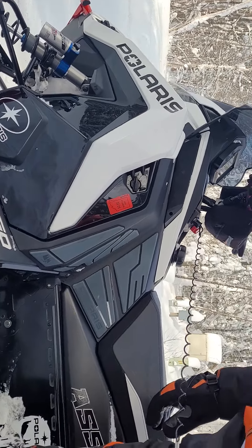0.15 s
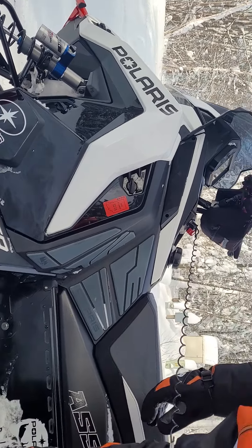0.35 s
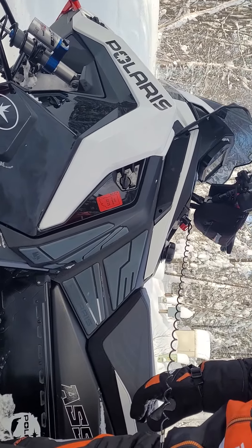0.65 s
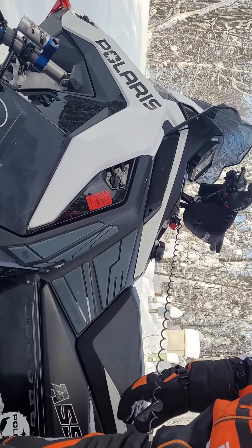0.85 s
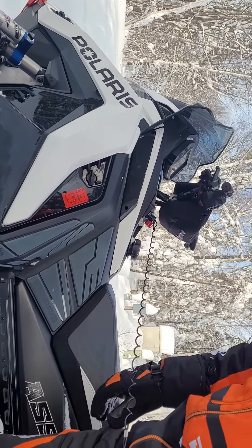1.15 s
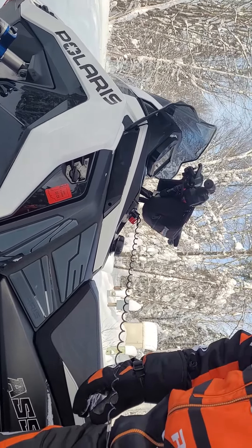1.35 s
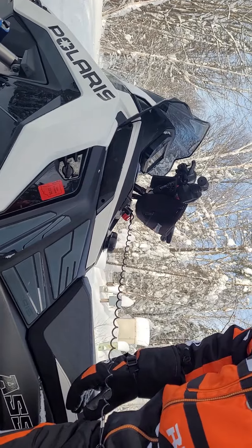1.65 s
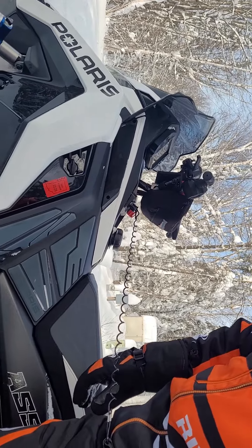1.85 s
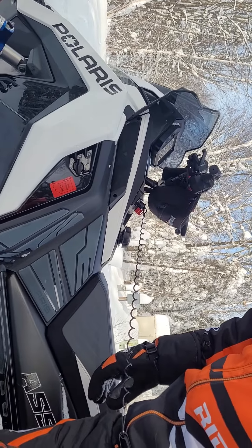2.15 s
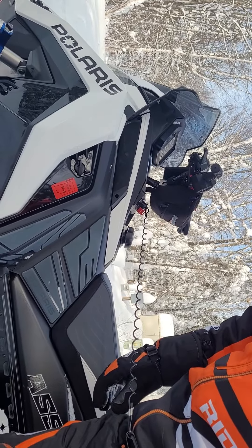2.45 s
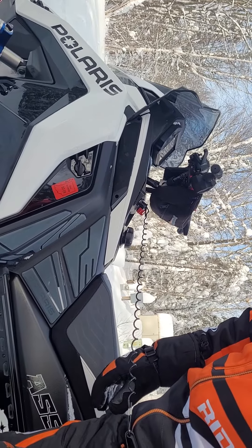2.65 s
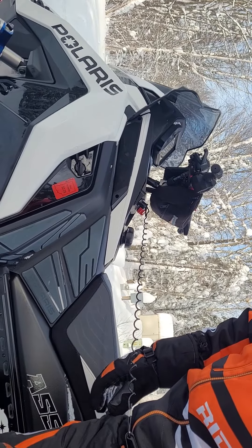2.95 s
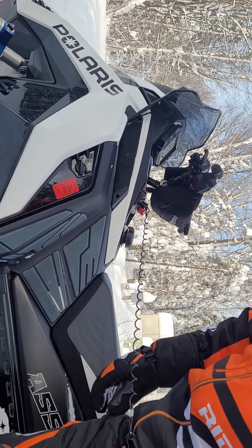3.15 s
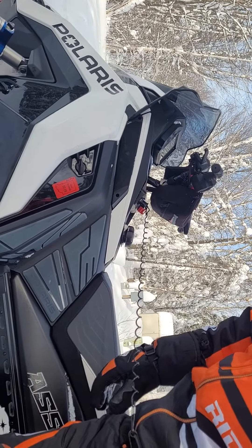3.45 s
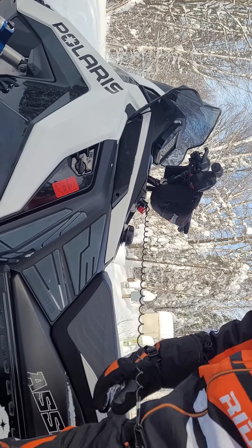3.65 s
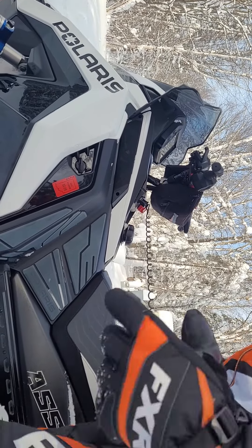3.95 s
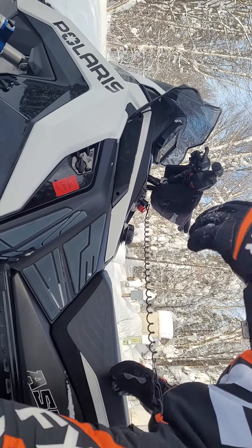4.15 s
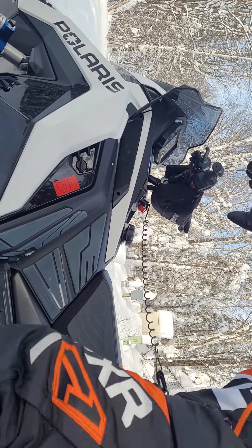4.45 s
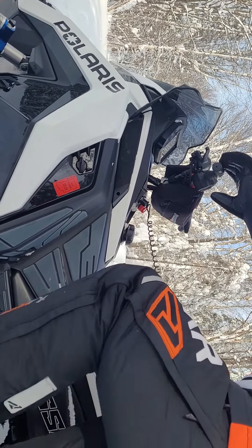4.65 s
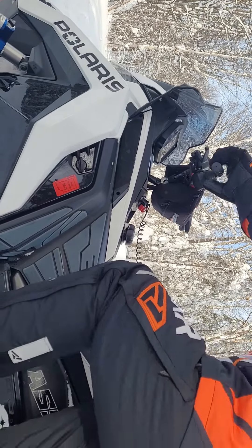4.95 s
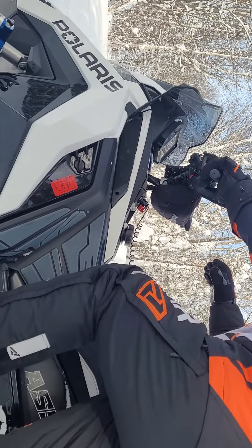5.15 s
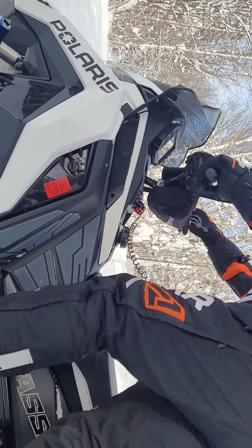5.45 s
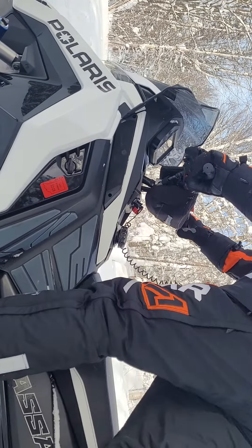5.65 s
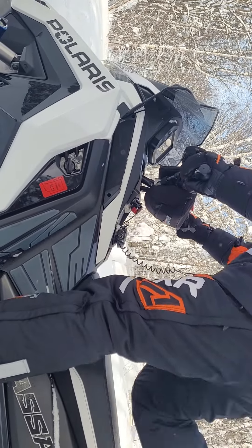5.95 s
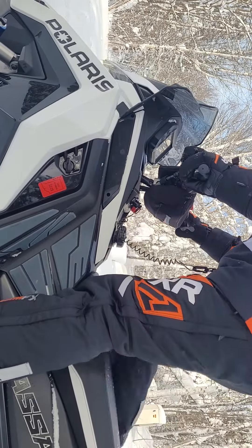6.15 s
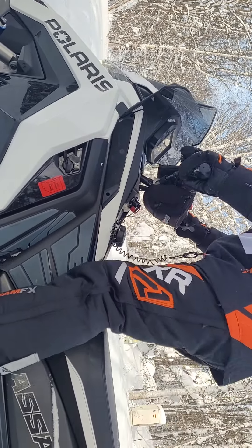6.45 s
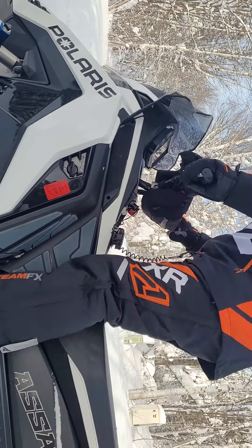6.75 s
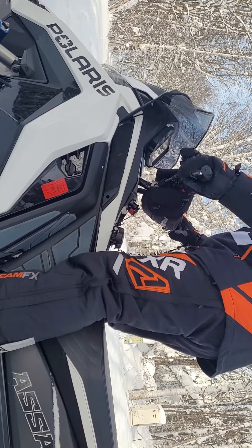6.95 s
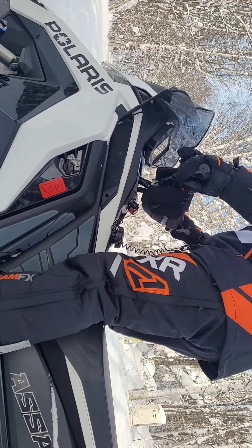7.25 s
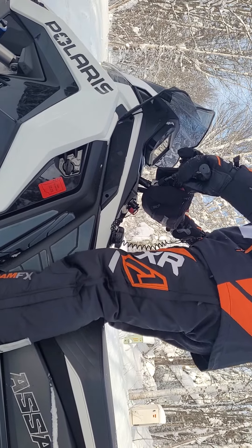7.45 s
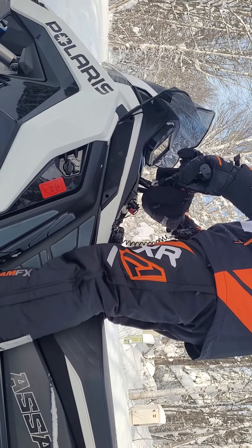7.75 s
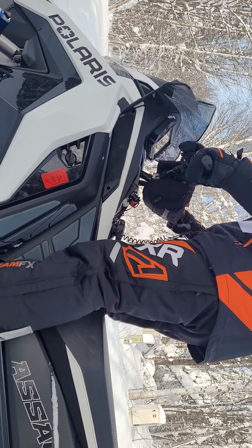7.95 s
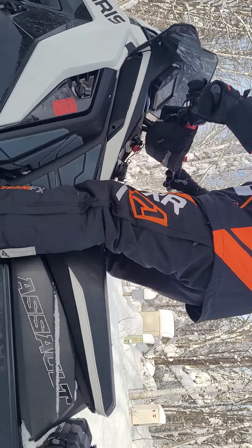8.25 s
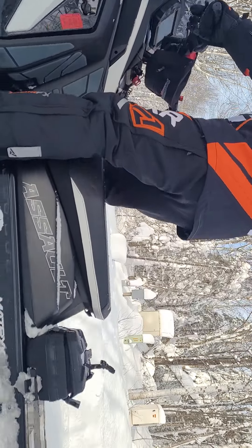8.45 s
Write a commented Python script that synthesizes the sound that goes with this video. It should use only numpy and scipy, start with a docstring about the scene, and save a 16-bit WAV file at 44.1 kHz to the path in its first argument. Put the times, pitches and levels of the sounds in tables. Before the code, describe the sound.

A two-stroke snowmobile idles loudly close to the microphone, outdoors on snow: a low drone with irregular thuds, pops and a metallic rattle. Midway, the rider's stiff suit rustles faintly and the bodywork gives a few light knocks. About seven seconds in the throttle opens, and the engine stumbles briefly, then climbs to a higher, buzzing pitch as the machine pulls away with clatter and a growing track hiss.

```python
"""A two-stroke twin snowmobile engine idles close by on snow, then opens up and pulls away.
At idle the pistons pump a drone out of the resonant exhaust pipe, and only every few strokes burn,
each with a thud and a rattle. The rider's suit rustles and the bodywork knocks now and then.
Under throttle the engine stumbles, then fires on every stroke: its harmonics sweep through the
pipe's resonances while the casing clatters and the track hisses louder with speed."""
import sys
import numpy as np
from scipy import signal
from scipy.fft import rfft, irfft
from scipy.io import wavfile
from scipy.ndimage import uniform_filter1d

SR = 44100
rng = np.random.default_rng(int(sys.argv[2]) if len(sys.argv) > 2 else 0)


def unload_wav(signal):
    """Save mono or channel-first audio to the path in sys.argv[1] as 16-bit WAV at rate SR, clipped to [-1, 1]."""
    wavfile.write(
        sys.argv[1],
        SR,
        np.round(np.clip(np.atleast_2d(signal).T, -1, 1) * 32767).astype(np.int16),
    )


N = 379701
T = np.arange(N) / SR
FREQS = np.fft.rfftfreq(2 * N, 1 / SR)
IDLE_HZ, THROTTLE_S = 57.4, 7.12  # stroke rate at idle, moment the throttle opens

# Idle strokes that burn, in a loping pattern. Each row: time in seconds, relative rattle level in dB.
BURNS = [(0.0009, 0.5), (0.0875, 0), (0.14, 4.5), (0.2246, -1), (0.2595, -2.5), (0.3106, 0.5), (0.397, 2),
         (0.4479, 5.5), (0.534, -4), (0.5864, 1.5), (0.71, -3.5), (0.744, -2), (0.8486, -1), (0.9025, -1.5),
         (0.936, -4.5), (0.9915, 0.5), (1.044, -0.5), (1.1302, 0.5), (1.1797, 2), (1.2684, 2.5),
         (1.3177, -2.5), (1.4083, 1), (1.4618, 0.5), (1.548, -1.5), (1.6034, 3), (1.6879, 0.5),
         (1.7413, -0.5), (1.7914, -3.5), (1.8244, 5.5), (1.9158, 0.5), (1.9666, 2), (2.0527, -5.5),
         (2.089, -2), (2.141, -2), (2.1922, -4), (2.2267, -5.5), (2.2815, 3.5), (2.3676, -2), (2.4215, 2.5),
         (2.4723, -1), (2.5595, -2), (2.6105, 2.5), (2.6945, -6), (2.7281, -1.5), (2.8197, 2), (2.87, -1.5),
         (2.9606, 3), (3.0126, 3.5), (3.0968, -1), (3.1879, 3), (3.239, 1.5), (3.3252, 1.5), (3.3758, -4),
         (3.411, 1), (3.4622, -1), (3.516, -2), (3.5507, -8.5), (3.5853, -5.5), (3.6406, 2), (3.7623, -4),
         (3.8153, -5.5), (3.8673, -1), (3.959, -1), (4.0135, 4), (4.1554, 4.5), (4.3144, 3.5),
         (4.4558, 3.5), (4.5429, 0.5), (4.6489, 1.5), (4.699, 1.5), (4.7849, -8), (4.8209, -3.5),
         (4.8723, 2), (4.9565, 3), (5.0477, 4), (5.1007, 1.5), (5.1505, -1.5), (5.185, 4), (5.2389, 6),
         (5.3246, 2), (5.3768, -3), (5.4129, 3.5), (5.4647, 4), (5.552, 2), (5.6024, 0), (5.6883, -0.5),
         (5.7747, 5), (5.8253, -0.5), (5.9147, 4.5), (5.9643, 1.5), (6.0473, -3), (6.0825, 2), (6.1339, 5),
         (6.22, 1), (6.2727, -2.5), (6.307, -5.5), (6.3596, -7.5), (6.3955, -1), (6.4473, 6), (6.535, 4),
         (6.6235, 0.5), (6.6731, 5), (6.8118, 6), (6.9298, -4), (6.9835, 4), (7.1056, 4)]
BURN_TIMES, BURN_RATTLE_DB = np.transpose(BURNS)
# Pulling away. Each row: time in seconds, stroke rate in Hz, relative clatter level in dB.
PULL_AWAY = [(7.12, 60.8, -56), (7.128, 61.41, -28), (7.24, 69.65, -39.5), (7.654, 122, -30),
             (7.692, 129.6, -31), (7.758, 134.2, -30), (7.842, 146.2, -30), (7.936, 153.6, -30),
             (8.256, 163.8, -30), (8.476, 160.2, -32), (8.604, 151.7, -33), (8.61, 150.4, -30)]
# Response of exhaust pipe and silencer. Each row: frequency in Hz, gain in dB.
PIPE_RESPONSE = [(22, -38), (38, -6), (60, 6), (95, 4), (118, 17.5), (138, -1), (162, 4), (200, -8),
                 (240, -6.5), (285, -1), (330, -14.5), (395, -9.5), (460, -22), (900, -75.5)]


def undb(db):
    """Decibels to amplitude ratio."""
    return 10 ** (np.asarray(db) / 20)


def unit(x):
    """Normalisation to rms 1."""
    return x / np.sqrt(np.mean(x ** 2))


def along(points, column=1):
    """Linear interpolation of one column over time; the first column is in seconds."""
    rows = np.array(points)
    return np.interp(T, rows[:, 0], rows[:, column])


def across(points):
    """Interpolation of (Hz, value) points on a log-frequency axis."""
    hz, value = np.transpose(points)
    return np.interp(np.log(FREQS + 1), np.log(hz), value)


def through(x, response):
    """Linear filtering: the spectrum is multiplied by a frequency response."""
    return irfft(rfft(x, 2 * N) * response)[..., :N]


def body(points):
    """Minimum-phase response with a (Hz, dB) outline: it rings after a blow, never before."""
    cepstrum = irfft(across(points) * np.log(10) / 20)
    cepstrum[1:N] *= 2
    cepstrum[N + 1:] = 0
    return np.exp(rfft(cepstrum))


def resonance(hz, width_hz):
    """Response of a damped oscillator, gain 1 at its centre."""
    return 1j * FREQS * width_hz / (hz ** 2 - FREQS ** 2 + 1j * FREQS * width_hz)


def clicks(times, sizes):
    """Impulse train with the given times and heights."""
    return np.bincount(np.clip(np.asarray(times) * SR, 0, N).astype(int), sizes, N + 1)[:N]


def swell(x, peak_s, sharp):
    """Convolution turns each impulse into a bump of its own height that peaks after peak_s."""
    age = T[:SR // 3] / peak_s
    return signal.fftconvolve(x, (age * np.exp(1 - age)) ** sharp)[:N]


def scatter(count, spread_db):
    """Log-normal random gains."""
    return undb(spread_db * rng.standard_normal(count))


def grit(spread_db, size=48):
    """Random amplitude modulation breaks two noises into millisecond grains."""
    grains = np.repeat(scatter(N // size + 1, spread_db), size)[:N]
    return unit(grains * rng.standard_normal((2, N)))


def stereo(pair):
    """Partial coherence: two unrelated signals become more alike in the lows; the treble leans left."""
    # Each row: frequency in Hz, correlation of left and right.
    coherence = [(400, .35), (700, .4), (1400, .4), (2800, .2), (6000, .08)]
    # Each row: frequency in Hz, left minus right in dB.
    treble_pan = [(500, 0), (1400, 1.3), (2800, 2), (5600, 7), (10000, 2), (14000, 7)]
    alike = np.clip(across(coherence), 0, 1)
    mid, side = through(pair[0], np.sqrt(1 + alike)), through(pair[1], np.sqrt(1 - alike))
    return through(np.array([mid + side, mid - side]), undb(np.outer([.5, -.5], across(treble_pan))))


def burn_strength(ordinary_gap_s=0.067):
    """Inertia: a rich burn carries the crank longer, so its strength is the next gap, in doublings."""
    return np.log2(np.r_[np.diff(BURN_TIMES), ordinary_gap_s] / ordinary_gap_s)


def crank(kick=5.74, coast_s=0.17, spin_up_s=0.0094, kick_db_per_doubling=3):
    """Phase, in strokes, is the integral of speed; at idle each burn kicks the crank, which coasts."""
    kicks = clicks(BURN_TIMES, kick * undb(kick_db_per_doubling * burn_strength()))
    surge = signal.fftconvolve(kicks, np.exp(-T / coast_s) - np.exp(-T / spin_up_s))[:N]
    idling = T < THROTTLE_S
    rate_hz = np.where(idling, IDLE_HZ + surge - surge[idling].mean(), along(PULL_AWAY))
    phase = np.cumsum(rate_hz) / SR
    # a burn always leaves through an opening port, a whole number of strokes after the last
    whole = np.r_[0, np.cumsum(np.round(np.diff(BURN_TIMES) * IDLE_HZ))]
    return phase + np.interp(T, BURN_TIMES, whole - np.interp(BURN_TIMES, T, phase))


def idle_drone(phase, lag_strokes=0.44, dent_db=-1.13, dent_db_per_doubling=-2.0):
    """Forced resonance: pumped gas drones in the pipe; a strong burn detunes the crank and dents it."""
    # Each row: multiple of the stroke rate, level in dB.
    harmonics = [(1, -36.5), (2, -10), (3, -35), (4, -34.5)]
    drone = sum(np.sqrt(2) * undb(db) * np.cos(2 * np.pi * np.round(multiple) * (phase - lag_strokes))
                for multiple, db in harmonics)
    dents = clicks(BURN_TIMES, dent_db + dent_db_per_doubling * burn_strength())
    return drone * undb(swell(dents, peak_s=0.033, sharp=3.5))


def idle_exhaust(phase, strokes, blast_db=29, blast_db_per_doubling=3, puff_db=-34.0):
    """Impulse excitation: over the drone, burns thud in the pipe and pop, and every stroke puffs."""
    # Silencer chambers rung by the puffs. Each row: frequency in Hz, nominal width in Hz, gain in dB.
    chamber_modes = [(250, 90, -8), (288.7, 40, -2), (388.5, 13, 4.5)]
    # The outlet chamber that pops: frequency in Hz, nominal width in Hz, gain in dB.
    outlet_mode = (394, 59, 21)
    burns = clicks(BURN_TIMES, np.ones(len(BURN_TIMES)))
    blasts = clicks(BURN_TIMES, undb(blast_db + blast_db_per_doubling * burn_strength()))
    thuds = through(blasts, body(PIPE_RESPONSE))
    pop_hz, pop_width, pop_db = outlet_mode
    pops = through(burns, undb(pop_db) * resonance(pop_hz, pop_width) ** 2)
    # strokes puff harder while the pipe still holds pressure from a burn
    pressure = 1 + swell(burns, peak_s=0.0055, sharp=0.38)
    puffs = pressure * clicks(strokes, scatter(len(strokes), spread_db=3.2)) * (T < THROTTLE_S)
    chambers = sum(undb(db) * resonance(hz, 2 * width) ** 2 for hz, width, db in chamber_modes)
    return idle_drone(phase) + thuds + pops + undb(puff_db) * unit(through(puffs + burns, chambers))


def idle_clatter(phase, steady_db=-41, rattle_db=-47, metal_db=-57):
    """Impact noise: pistons and gears clatter on every stroke; a burn rattles and rings the clutch."""
    # Spectrum of the clatter. Each row: frequency in Hz, gain in dB.
    colour = [(280, -25.5), (470, -44.5), (521, -7.5), (585, -12), (740, -4.5), (807, -9.5), (1200, -5),
              (1940, -20), (2490, -18), (3700, -26), (4040, -27), (7460, -32), (8390, -39), (11700, -34.5),
              (15500, -45)]
    # Modes of clutch and engine metal. Each row: frequency in Hz, width in Hz, gain in dB.
    metal_modes = [(2510, 110, -2), (3290, 67, -2.5), (3610, 37, -5), (3725, 28, 0), (4200, 55, -10.5),
                   (7120, 470, -15)]
    beat = 1 + 0.49 * np.exp(-(phase % 1) / 0.61)
    steady = unit(through(beat * grit(spread_db=0.0), body(colour)))
    shaking = swell(clicks(BURN_TIMES, undb(BURN_RATTLE_DB)), peak_s=0.0047, sharp=0.22)
    brighter = undb(across([(1200, 4.0), (4000, 0.5), (9000, 4.7), (14000, 6.6)]))
    rattle = unit(through(shaking * grit(spread_db=5.0), body(colour) * brighter))
    # every burn makes metal strike metal, a little more evenly than it rattles
    hardness = undb(0.87 * BURN_RATTLE_DB) * scatter(len(BURN_TIMES), spread_db=2.1)
    strikes = swell(clicks(BURN_TIMES, hardness), peak_s=0.006, sharp=1.0) * grit(spread_db=5.0)
    metal = sum(undb(db) * resonance(hz, width) for hz, width, db in metal_modes)
    ringing = unit(through(strikes, metal))
    return stereo(undb(steady_db) * steady + undb(rattle_db) * rattle + undb(metal_db) * ringing) / 2


def ticking(strokes, tick_db=-66):
    """Brief contacts have broad spectra: pistons and drive belt give a dry tick on every stroke."""
    # Each row: frequency in Hz, gain in dB.
    colour = [(1500, -16.5), (4500, -1.5), (7400, -3), (8600, -10), (11700, -1.5), (15500, -2.5)]
    hits = clicks(strokes, scatter(len(strokes), spread_db=3.5))
    ticks = swell(hits, peak_s=.0009, sharp=.8) * grit(spread_db=2.0)
    return undb(tick_db) * unit(stereo(through(ticks, body(colour))))


def suit_rustle():
    """Friction noise: stiff fabric crackles in fine, bright grains, most as the rider climbs on."""
    # Each row: time in seconds, level in dB.
    levels = [(0, -61), (.5, -72), (3.6, -72), (4.5, -59.5), (5.0, -58.5), (5.25, -54.5), (5.5, -59),
              (6.0, -61), (6.5, -58.5), (7.1, -61.5)]
    cloth = body([(1500, -14.5), (4000, -2.5), (7300, -8.5), (8700, -11), (12000, -7), (15500, -7)])
    return undb(along(levels)) * unit(stereo(through(grit(spread_db=4.0), cloth)))


def bodywork_knocks():
    """Damped vibration: each knock is a band of noise at a panel's resonance, dying exponentially."""
    # Each row: start in seconds, relative level in dB, centre in Hz, width in Hz, decay in seconds.
    knocks = [(1.835, -44, 644, 890, 0.0052), (1.835, -60, 4500, 6800, 0.0031),
              (5.223, -46, 4660, 1500, 0.011), (5.29, -40, 4700, 920, 0.0093),
              (5.779, -49, 3500, 5000, 0.0035), (8.125, -31, 3200, 3500, .016),
              (8.55, -30, 5500, 6000, 0.023)]
    out = np.zeros((2, N))
    for start, db, hz, width, decay_s in knocks:
        ring = unit(through(rng.standard_normal((2, N)), resonance(hz, width)))
        out += undb(db) * ring * (T > start) * np.exp(-np.abs(T - start) / decay_s)
    return stereo(out) / 2


def load_exhaust(phase, strokes, unevenness=0.34):
    """Periodic firing gives harmonics that swell at pipe resonances; weak burns burble between them."""
    # Each row: multiple of the stroke rate, relative level in dB.
    harmonics = [(1, 0.5), (2, -2.5), (3, -2.5), (4, -9)]
    # A harmonic sweeping through the pipe's resonances. Each row: frequency in Hz, level in dB.
    pipe_sweep = [(60, -28), (105, -26), (123, -5.5), (138, -15), (165, -17.5), (188, -43.5), (255, -20.5),
                  (290, -27), (325, -22), (415, -23), (470, -38), (650, -37.5)]
    # Relative strengths in dB of four successive strokes as the engine stumbles.
    stumble_db = [-5, -4, -21, -2]
    # The burble, until the engine runs clean. Each row: time in seconds, level in dB.
    burble_levels = [(7.12, -18), (7.5, -13), (7.8, -15.5), (7.87, -13.5), (8.1, -11), (8.17, -27.5),
                     (8.37, -29.5), (8.42, -16.5), (8.48, -29.5)]
    rate_hz, sweep_db = along(PULL_AWAY), across(pipe_sweep)
    tone = np.zeros(N)
    for multiple, db in harmonics:
        order = np.round(multiple)
        level_db = db + np.interp(order * rate_hz, FREQS, sweep_db)
        tone += np.sqrt(2) * undb(level_db) * np.sin(2 * np.pi * order * phase)
    sizes = undb(np.resize(stumble_db, len(strokes))) + unevenness * rng.standard_normal(len(strokes))
    # with the throttle open the burble is thinner, with less bass
    pipe = body(PIPE_RESPONSE) * undb(across([(60, -10.0), (115, -4.5), (200, -8.5), (400, -1)]))
    burble = through(clicks(strokes, sizes - sizes.mean()), pipe)
    burble /= np.sqrt(uniform_filter1d(burble ** 2, SR // 16) + 1e-12)  # running rms of 1
    return tone + undb(along(burble_levels)) * burble


def load_clatter(phase, strokes, ring_s=0.0094, jitter_s=0.00017, hiss_db=-36, hiss_db_per_octave=17):
    """Structure-borne and flow noise: cylinders knock the casing, gas rasps, the track hisses."""
    # Spectrum of knocks and rasp. Each row: frequency in Hz, gain in dB.
    engine_colour = [(250, -7), (430, -18.5), (523, -16), (746, -15), (1020, -19.5), (1500, -15.5),
                     (1790, -20), (2390, -20), (4000, -38), (5200, -77), (8800, -120)]
    # Spectrum of the track. Each row: frequency in Hz, gain in dB.
    track_colour = [(2060, -9.5), (3500, -4.5), (4120, -3.5), (5020, -4), (6360, -9.5), (7480, -7.5),
                    (8740, -15.5), (11500, -10.5), (15500, -18)]
    # Each row: multiple of the stroke rate, level in dB relative to the clatter.
    casing_tones = [(.5, -4), (4.5, -15), (7, -17), (8, -17), (9.5, -20)]
    sizes = scatter(len(strokes), spread_db=3)
    # play in the bearings makes each knock a little early or late
    strokes = strokes + jitter_s * rng.standard_normal(len(strokes))
    # the two cylinders take turns, each with its own impulse response
    casing = rng.standard_normal((2, 2, SR // 10)) * np.exp(-T[:SR // 10] / ring_s)
    blows = sum(signal.fftconvolve(clicks(strokes[k::2], sizes[k::2])[None], casing[k])[:, :N]
                for k in range(2))
    blows = stereo(through(blows, body(engine_colour)))
    blows /= blows[:, T > THROTTLE_S].std()
    pulsing_noise = (1 + np.exp(-(phase % 1) / 2.6)) * grit(spread_db=2.0)
    rasp = unit(stereo(through(pulsing_noise, body(engine_colour))))
    hiss = unit(stereo(through(pulsing_noise, body(track_colour))))
    tones = sum(np.sqrt(2) * undb(db) * np.cos(np.pi * np.round(2 * multiple) * phase)
                for multiple, db in casing_tones)
    clatter = undb(-5) * blows + undb(-1) * rasp + tones
    rate_hz, clatter_db = along(PULL_AWAY), along(PULL_AWAY, column=2) + 3
    octaves = np.log2(rate_hz / rate_hz.max())
    return undb(clatter_db) * clatter + undb(hiss_db + hiss_db_per_octave * octaves) * hiss


def scene(open_s=0.027, engage_s=.28, left_lead_rad=.16):
    """Superposition: one crank times the engine; the throttle opens fast, the load builds gradually."""
    phase = crank()
    strokes = np.interp(np.arange(np.ceil(phase[-1])), phase, T)  # times in seconds
    throttle = np.clip((T - THROTTLE_S) / open_s + .5, 0, 1)
    load = np.clip((T - THROTTLE_S) / engage_s, 0, 1)
    exhaust = (1 - throttle) * idle_exhaust(phase, strokes) + throttle * load_exhaust(phase, strokes)
    # the exhaust leads on the left and is slightly louder on the right
    exhaust = through(exhaust, np.exp(1j * left_lead_rad * np.array([[.5], [-.5]])))
    exhaust *= undb([[-.4], [.4]])
    machinery = idle_clatter(phase) + ticking(strokes) + load * load_clatter(phase, strokes)
    return exhaust + machinery + suit_rustle() + bodywork_knocks()


def record(dry):
    """Hard clipping at full scale, then a steep low-pass at 15750 Hz."""
    return signal.sosfilt(signal.ellip(8, .2, 70, 15750, fs=SR, output="sos"), np.clip(dry, -1, 1))


dry = scene()
out = record(dry)
unload_wav(out)
```